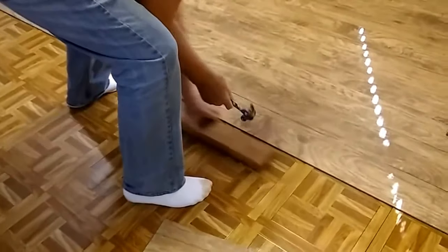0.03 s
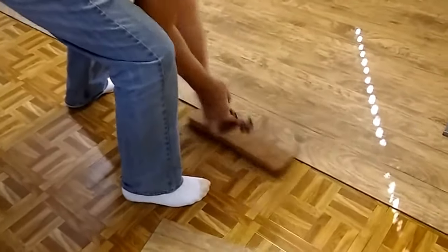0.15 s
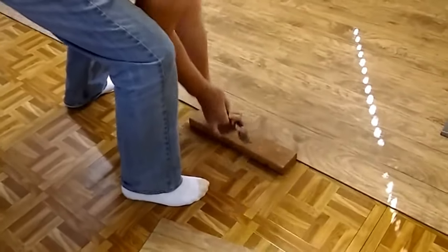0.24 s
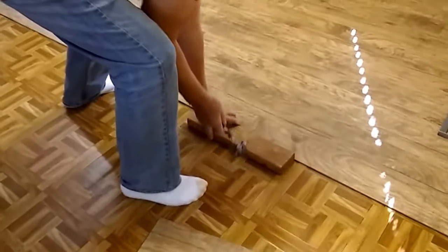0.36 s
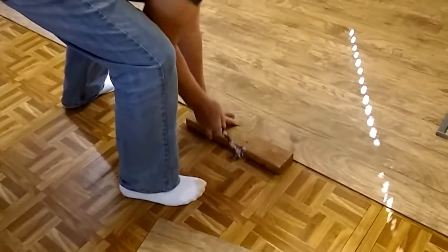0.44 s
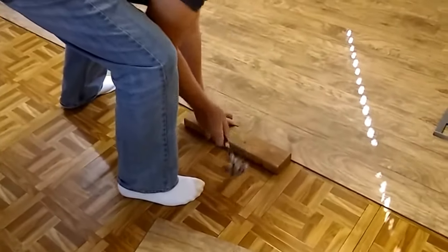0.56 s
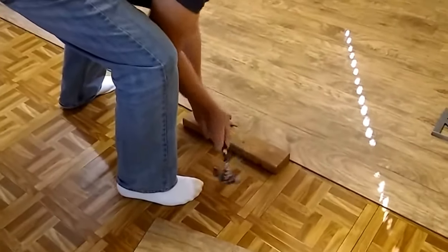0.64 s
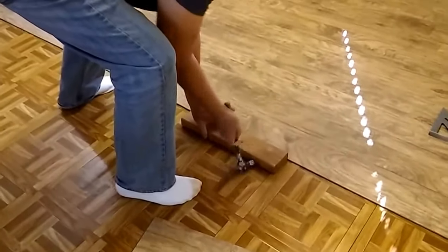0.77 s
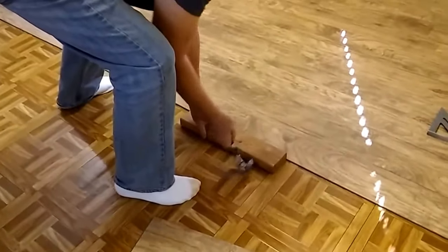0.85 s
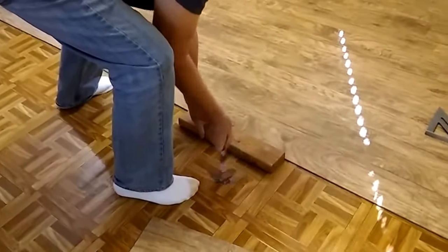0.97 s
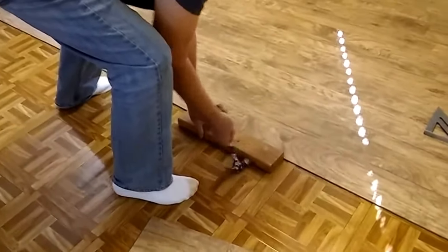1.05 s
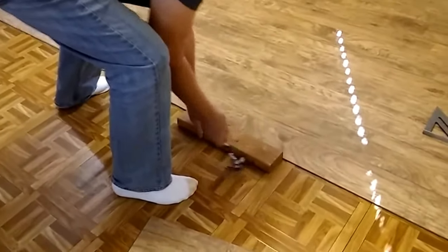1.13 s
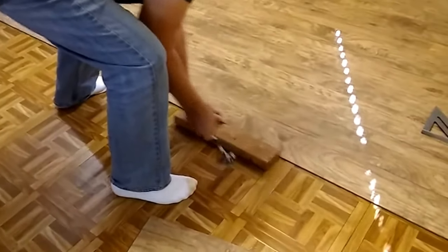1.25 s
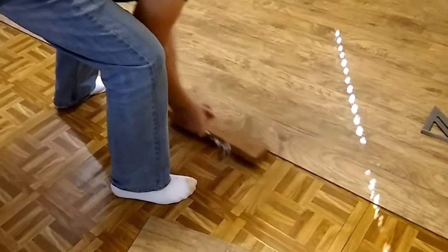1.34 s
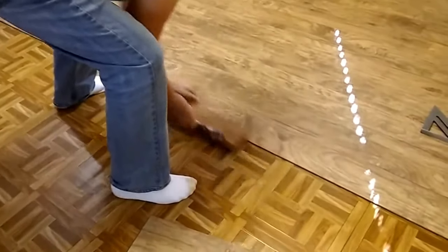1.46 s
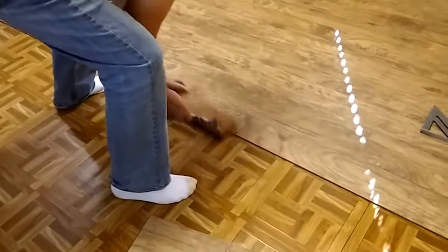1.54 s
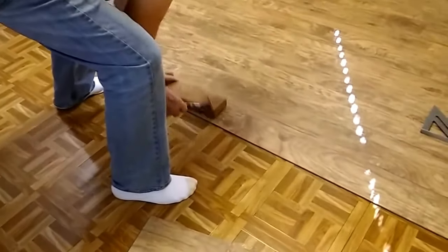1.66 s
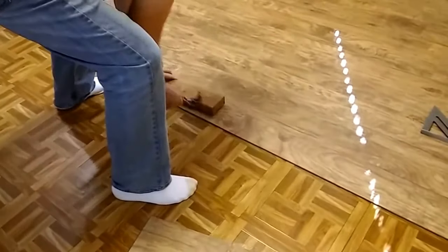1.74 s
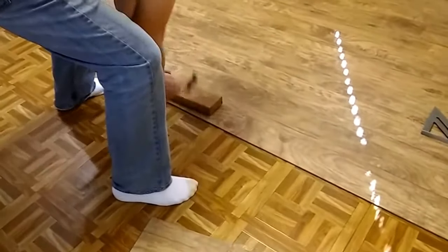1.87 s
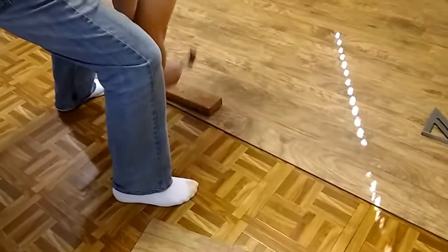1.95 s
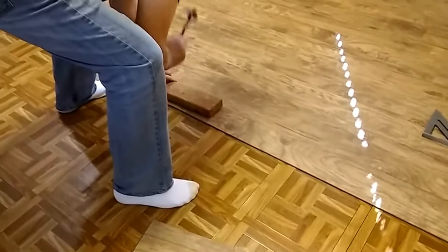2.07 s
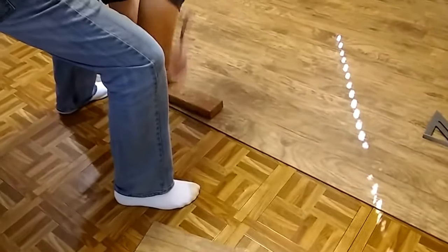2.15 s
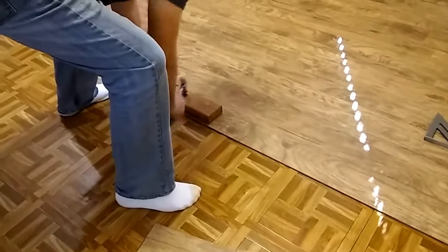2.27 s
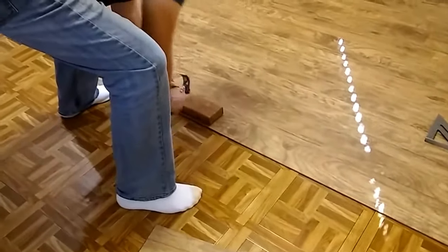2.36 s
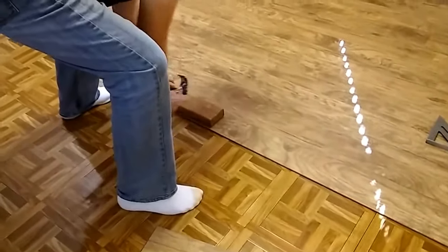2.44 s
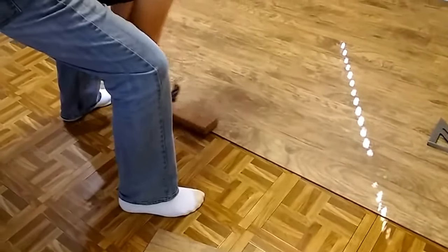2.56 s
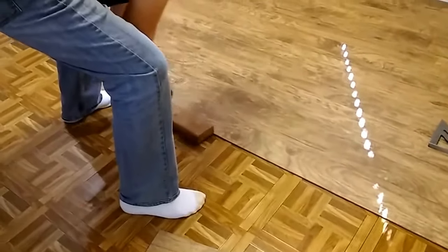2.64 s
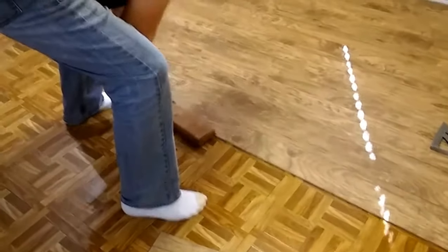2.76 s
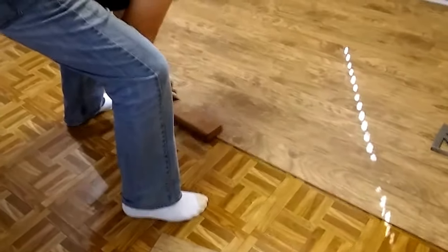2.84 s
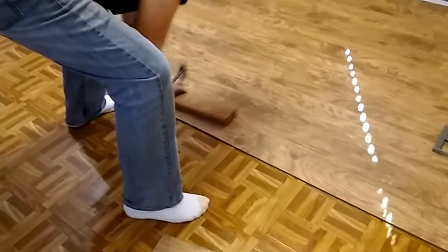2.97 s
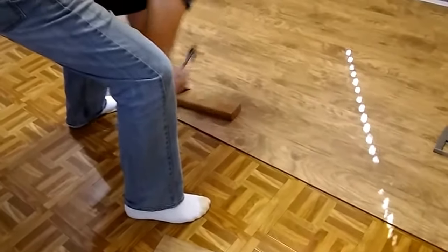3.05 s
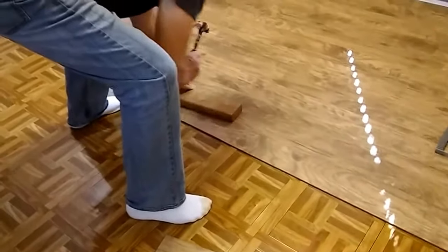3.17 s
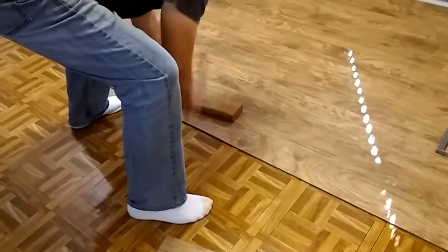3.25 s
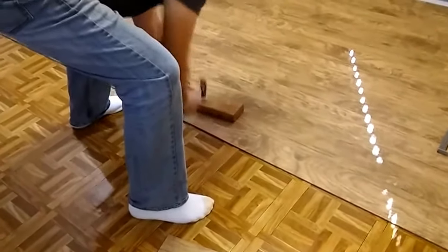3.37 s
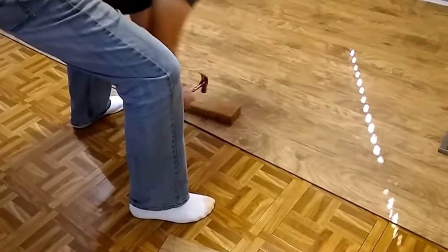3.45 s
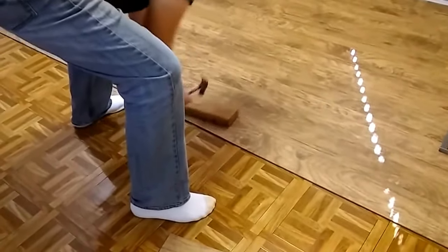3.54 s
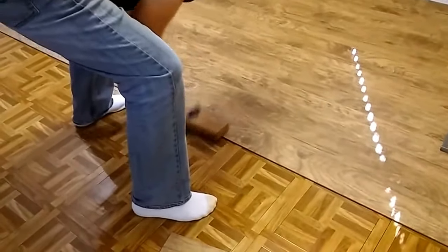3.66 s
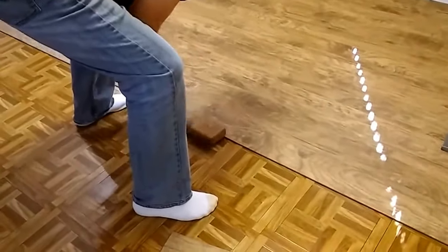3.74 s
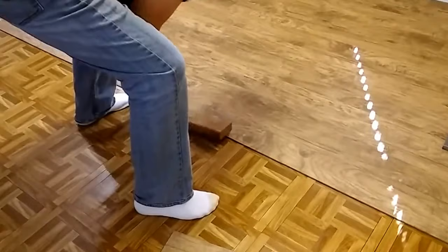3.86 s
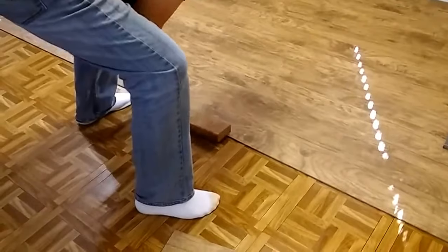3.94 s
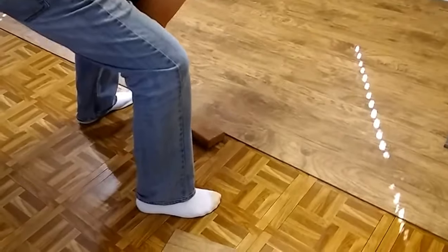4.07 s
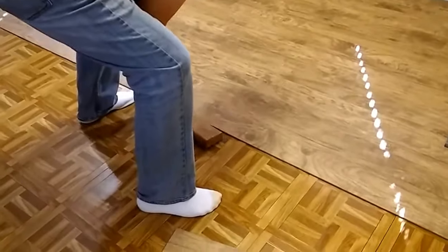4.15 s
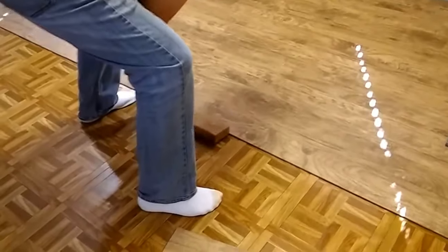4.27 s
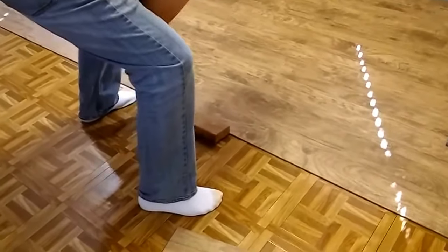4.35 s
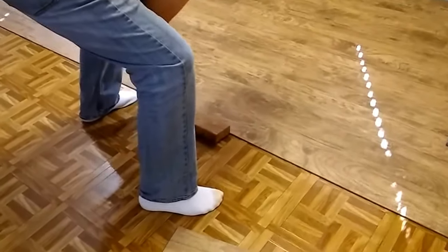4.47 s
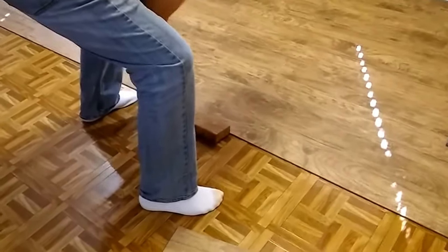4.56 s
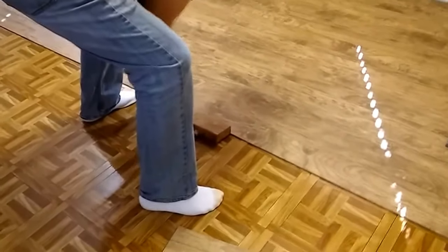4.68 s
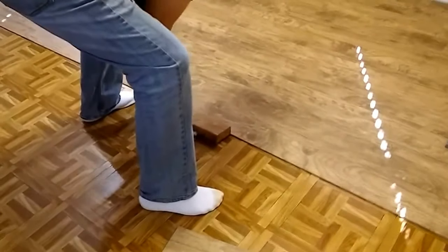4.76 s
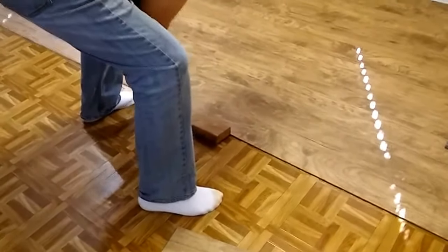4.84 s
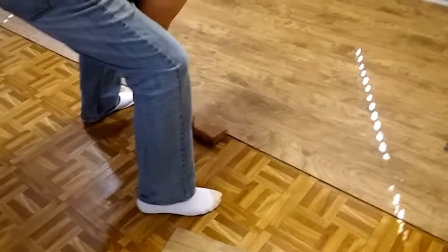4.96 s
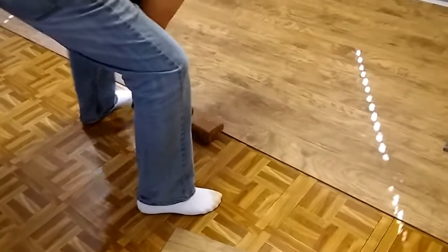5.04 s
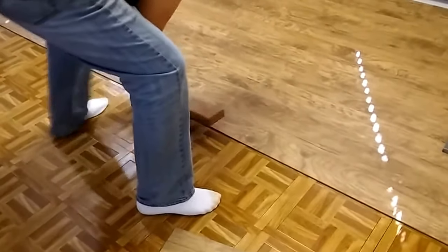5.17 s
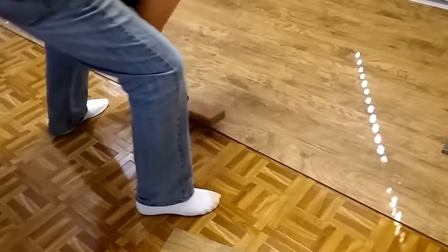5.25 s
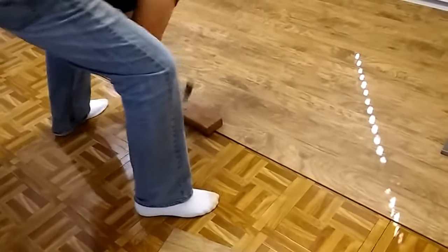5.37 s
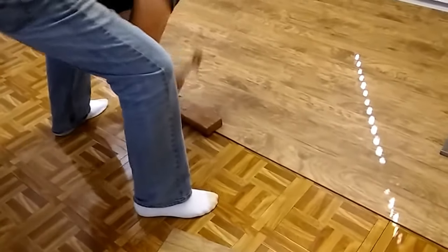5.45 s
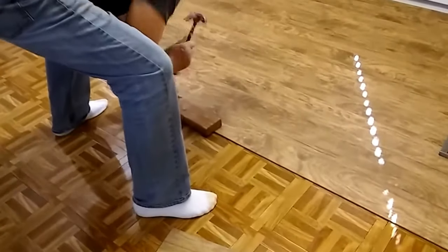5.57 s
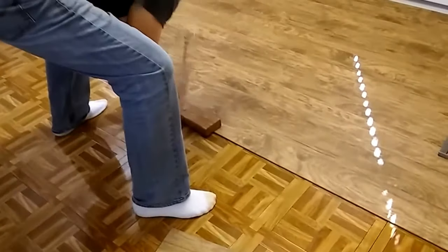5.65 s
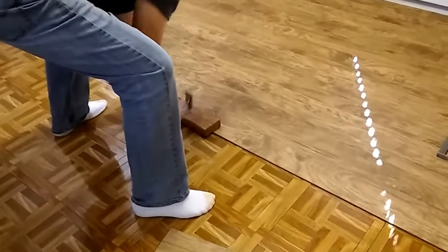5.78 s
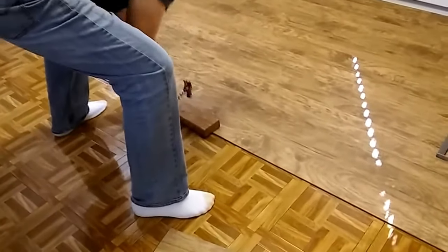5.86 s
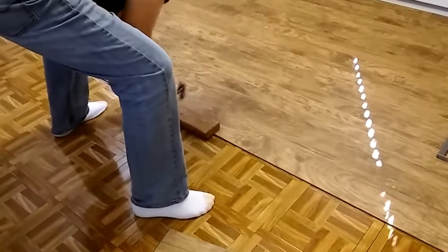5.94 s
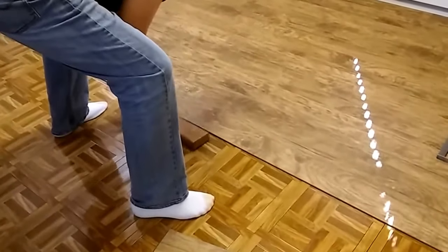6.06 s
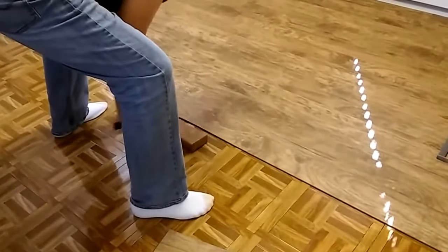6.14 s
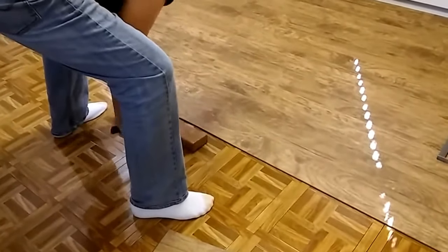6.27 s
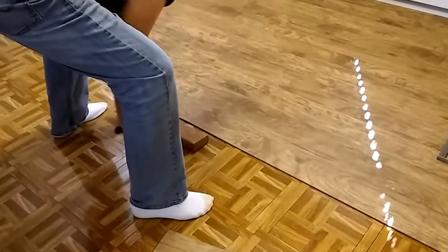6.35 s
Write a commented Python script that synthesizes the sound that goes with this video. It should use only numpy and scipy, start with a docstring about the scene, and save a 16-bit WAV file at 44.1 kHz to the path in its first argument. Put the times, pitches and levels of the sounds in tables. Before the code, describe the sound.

Six hard hammer blows on a wooden block against floor planks crack through a bare, echoing room, among soft thuds, clicks and one brief slide.

```python
"""Six hard wooden knocks ring out in a bare room: a hammer drives a block against the edge of a floor plank.
Each blow is a short burst of contact noise, filtered by the wood's resonances and prolonged by reverberation.
Around the blows come soft thuds and clicks, shuffling taps, ringing steel, one slide of the block over the
boards and dull finger bumps on the camera body, all over low room noise and a faint, nearly steady whine.
A fast limiter holds the loud blows down."""
import sys
import numpy as np
from scipy import signal
from scipy.fft import rfft
from scipy.io import wavfile
from scipy.ndimage import uniform_filter1d, minimum_filter1d

SR = 44100
rng = np.random.default_rng(int(sys.argv[2]) if len(sys.argv) > 2 else 0)


def to_wav(sig):
    """Store sig (one row per channel, or 1-D mono) as 16-bit WAV at the path in sys.argv[1].

    Samples outside -1..1 are clipped; the rate is SR.
    """
    pcm = np.clip(np.atleast_2d(sig), -1, 1) * 32767
    pcm = np.round(pcm).astype(np.int16)
    wavfile.write(sys.argv[1], SR, pcm.T)  # frames by channels


N = 282681
HZ = np.fft.rfftfreq(16384, 1 / SR)  # frequency axis of every filter
TIME = np.arange(SR) / SR  # one second, the length of every single event

# hammer blows; stroke is 0 side tap, 1 full swing, 2 short swing:
# start_s, force_db, stroke, floor_thump_db, treble_crack_db, direct_sound_db, block_swing_db
BLOWS = [(0.7706, -4.5, 0, -12, -2, 2.5, 4.5), (1.0506, -8, 0, -8, -7.5, 6.5, 5.5),
         (2.2213, 2, 1, -3, 6.5, 8, -11), (3.3168, 1, 1, -2, 4.5, 8.5, -7),
         (4.6843, -6.5, 2, -2.5, 2, 2, -6.5), (5.7059, 2, 1, -0.5, 7, 9, 3)]
# the block set down, the hammer laid against it: start_s, thud_db, thud_top_hz, click_db
KNOCKS = [(0.118, -10.5, 170, -44.5), (0.141, -8, 180, -40.5), (0.196, -19.5, 476, -30.5),
          (.222, -12.5, 690, -55), (1.629, -12.5, 257, -32.5), (3.875, -23.5, 456, -48.5),
          (4.018, -23, 303, -42.5), (4.043, -11, 294, -33), (4.151, -20.5, 308, -41.5),
          (4.262, -9, 408, -32.5), (5.2628, -12.5, 277, -30.5), (5.293, -5.5, 416, -21),
          (6.063, -11.5, 292, -31.5), (6.205, -20.5, 535, -45.5)]


def hammer(thump_hz=400, crack_hz=5000, direct_resonance=0.56, contact_delay_s=0.001):
    """Impact excitation: the block swings, slams into the plank, and contact force drives wood and room."""
    # spectrum of the steel-on-wood contact: pitch_hz, level_db
    contact_spectrum = [(20, 3), (60, 21.5), (105, 24), (140, 30), (400, 32.5), (750, 31.5), (1500, 30.5),
                        (3000, 30.5), (5000, 15.5), (7000, 6), (9500, -8), (15500, -16)]
    # direct path against the room path: pitch_hz, level_db
    direct_path = [(50, -33), (150, -18.5), (500, -34), (2000, -35.5), (4000, -30.5), (7000, -26.5),
                   (14000, -21)]
    out = np.zeros(N)
    low = 1 / (1 + (HZ / thump_hz) ** 2)
    high = HZ ** 2 / (HZ ** 2 + crack_hz ** 2)
    block_hz, block_decay_s, block_rise_s = 950, 0.0012, 0.00066
    swing = np.sin(2 * np.pi * block_hz * TIME) * np.exp(-TIME / block_decay_s)
    swing *= 1 - np.exp(-TIME / block_rise_s)
    for s, force_db, stroke, thump_db, crack_db, direct_db, swing_db in BLOWS:
        # downward force adds thump, hard contact adds treble
        contact = amp(force_db + read(contact_spectrum, HZ) + thump_db * low + crack_db * high)
        body = wood(stroke)
        # the direct sound carries the resonances in flattened form
        direct_gain = amp(direct_db + read(direct_path, HZ)) * contact * body ** direct_resonance
        direct = reflected(colour(burst(decay_s=0.005), direct_gain))
        reverberant = colour(room_tail(build_s=0.0011), contact * body)
        add(out, s, reflected(amp(swing_db) * swing))
        add(out, s + contact_delay_s, direct + reverberant)
    return out


def burst(decay_s, uneven_db=3.5):
    """Impulsive contact: one push, then a short, uneven chatter of wood on wood with exponential decay."""
    sign = rng.choice([-1., 1.], SR)
    size = evened(uniform_filter1d(rng.standard_normal(SR), size=24))
    chatter = evened(amp(uneven_db * size) * sign) * np.exp(-TIME / decay_s)
    chatter[0] += 6
    return chatter


def wood(stroke):
    """Modal resonance: where the block is hit decides how strongly each mode responds."""
    # modes of block, planks and floor: pitch_hz, width_hz, side_tap_db, full_swing_db, short_swing_db
    wood_modes = [(153.3, 12, 17, 12, 9), (167, 15, 4, 6, 11.5), (198.5, 17, 11, 5, 0),
                  (248.5, 8.6, 8.5, 10.5, 4.5), (309.4, 37, 13, 13.5, 17), (395, 31, -38.5, -3, 14),
                  (432, 5.5, 12, 11.5, 12.5), (527, 100, 11.5, 8, 8), (608, 32, -18.5, 8.5, -12),
                  (717, 130, 8.5, 4.5, 9), (782, 110, 6.5, -3, -21), (970, 150, 9.5, -35.5, -7),
                  (1095, 82, 14, 12.5, 9.5), (1220, 240, 6.5, 7.5, 5), (1424, 28, 8, 8.5, 8),
                  (1518, 13, 5, 8.5, -3), (1576, 23, -3.5, 10.5, 9), (1724, 53, 8.5, 11.5, 7.5),
                  (1920, 110, 8, 2.5, 5), (2218, 110, 1.5, 7, 7.5), (2362, 40, 10.5, 9, 14),
                  (2454, 35, 11.5, -6, 7.5), (2920, 120, -23, -1, -14.5), (3012, 42, 6, 3.5, -11.5),
                  (3295, 120, 6.5, -13.5, 11.5), (4230, 820, 3.5, -1.5, 6), (4730, 150, 0, -81, 9.5),
                  (5710, 440, 0, -1, 9)]
    hz, width, *stroke_db = np.transpose(wood_modes)
    peaks = 1 / (1 + (2 * (HZ[:, None] - hz) / width) ** 2)  # power response of each mode
    power = amp(stroke_db[int(stroke)]) ** 2
    return np.sqrt(1 + peaks @ power)


def room_tail(build_s):
    """Diffuse reverberation: dense reflections build up, then die band by band; spectrum levelled to 1."""
    # reverberation of the bare room: pitch_hz, t60_s
    room_decay = [(50, 0.36), (150, 0.48), (300, 0.4), (600, 0.49), (1200, 0.57), (2500, 0.61), (4500, 0.6),
                  (7000, 0.5), (11000, 0.47), (16000, .31)]
    hz, t, z = signal.stft(rng.choice([-1., 1.], SR), SR, nperseg=512)
    z = z * amp(-60 * t / read(room_decay, hz)[:, None])
    tail = signal.istft(z, SR, nperseg=512)[1][:SR]
    tail = tail * (1 - np.exp(-TIME / build_s))
    power = uniform_filter1d(abs(rfft(tail, 16384)) ** 2, size=14)
    return colour(tail, 1 / np.sqrt(power))


def reflected(x):
    """Specular reflection: delayed, scaled copies follow the direct sound."""
    # first reflections from floor, ceiling and walls: delay_s, level_db
    first_echoes = [(.0022, -3.5), (.0046, -8), (.0094, -2.5), (0.0138, -5.5), (0.0208, -6.5),
                    (.029, -14.5)]
    out = x.copy()
    for delay_s, db in first_echoes:
        add(out, delay_s, amp(db) * x)
    return out


def knocks(floor_hz=125, thud_ring=0.7, thud_room_db=25, click_room_db=25, click_ring=0.54):
    """Contact stiffness: soft contacts thud in the floor, hard corners add a light click."""
    # spectrum of the light clicks: pitch_hz, level_db
    click_spectrum = [(100, -19), (600, 7), (1700, 5), (3500, -1), (5500, -11.5), (8000, -22.5),
                      (15000, -40)]
    out = np.zeros(N)
    # exponents below 1 flatten the resonances
    body = wood(0) ** thud_ring
    clack = amp(read(click_spectrum, HZ)) * wood(2) ** click_ring
    floor = (HZ / floor_hz) ** 3 / np.sqrt(1 + (HZ / floor_hz) ** 6)  # high-pass
    for s, thud_db, top_hz, click_db in small_contacts():
        soft = 1 / np.sqrt(1 + (HZ / top_hz) ** 8)  # low-pass
        thud_room = room_tail(build_s=0.0055) * np.exp(-TIME / 0.19)
        thud = burst(decay_s=0.028) + amp(thud_room_db) * thud_room
        click = burst(decay_s=0.004) + amp(click_room_db) * room_tail(build_s=0.0017)
        add(out, s, colour(thud, amp(thud_db) * floor * soft * body))
        add(out, s, colour(click, amp(click_db) * clack))
    return out


def small_contacts(settle_s=0.048, settle_db=-9.5):
    """Repeated impact: each knock rocks once more, later and softer; shifting feet and hands tap in runs."""
    # feet and hands shifting, a run of soft taps: start_s, end_s, thud_db
    tap_runs = [(0.002, .11, -24.5), (1.462, 1.6, -26.5), (4.225, 4.26, -16.5), (4.39, 4.5, -35.5),
                (5.65, 5.7, -31.5)]
    tap_gap_s, tap_spread_db, tap_top_hz, tap_click_db = 0.059, 1.5, 218, -50
    rows = list(KNOCKS)
    for (s, thud_db, top_hz, click_db), late in zip(KNOCKS, rng.random(len(KNOCKS))):
        rows.append((s + settle_s * (.5 + late), thud_db + settle_db, top_hz, click_db + settle_db))
    for start, end, db in tap_runs:
        gaps = rng.random(8)
        thuds, clicks = rng.standard_normal(8), rng.standard_normal(8)
        times = start + tap_gap_s * np.r_[0, np.cumsum(.5 + gaps)]
        for s, thud, click in zip(times, thuds, clicks):
            if s < end:
                thud_db, click_db = db + tap_spread_db * thud, tap_click_db + tap_spread_db * click
                rows.append((s, thud_db, tap_top_hz, click_db))
    return rows


def pings(head_hz=2560, head_t60_s=0.56, head_knock_db=-21, head_blow_db=-39.5):
    """Free vibration: the steel head rings in step with each knock's click and blow's force; boards sound notes."""
    # a tight joint or a hollow board sounding one note under load: start_s, pitch_hz, level_db, t60_s
    board_notes = [(0.14, 1800, -37, .12), (.222, 714, -23, 0.018), (4.042, 1730, -44, 0.26)]
    out = np.zeros(N)
    for s, _, _, click_db in KNOCKS:
        add(out, s, mode(head_hz, click_db + head_knock_db, head_t60_s))
    for s, force_db, *_ in BLOWS:
        add(out, s, mode(head_hz, force_db + head_blow_db, head_t60_s))
    for s, hz, db, t60 in board_notes:
        add(out, s, mode(hz, db, t60))
    return out


def mode(hz, db, t60):
    """Damped oscillation: a single mode loses 60 dB in t60 seconds."""
    return amp(db - 60 * TIME / t60) * np.sin(2 * np.pi * hz * TIME)


def slide(start_s=2.837, rise_s=0.11, hold_s=0.05, fade_db_per_s=86.5, level_db=-45, grain_db=1.5):
    """Sliding friction: fine grains of noise as the block gathers speed over the boards, glides and fades."""
    # spectrum of wood rubbing on boards: pitch_hz, level_db
    rub_spectrum = [(80, -7), (280, 8.5), (600, 2.5), (1800, 1), (4000, -2), (6000, -14), (8500, -27),
                    (15000, -29)]
    t = np.arange(N) / SR - start_s
    fading_s = np.maximum(t - rise_s - hold_s, 0)
    level = np.clip(t / rise_s, 0, 1) * amp(level_db - fade_db_per_s * fading_s)
    grains = evened(uniform_filter1d(rng.standard_normal(N), size=160))
    friction = rng.standard_normal(N) * amp(grain_db * grains)
    return level * evened(colour(friction, amp(read(rub_spectrum, HZ))))


def bumps(decay_cycles=0.49, rise_s=0.00035, casing_hz=600, rattle_s=0.0074):
    """Structure-borne sound: dull, dry pops reach the microphone through the casing; the lower, the longer."""
    # fingers bumping the camera body: start_s, level_db, pitch_hz, casing_rattle_db
    finger_bumps = [(1.8026, -11, 298, -12), (1.8219, -15.5, 241, -15), (1.844, -24, 294, -24),
                    (2.499, -10, 400, -43), (2.768, -26, 287, -35), (2.785, -27.5, 158, -24.5),
                    (3.0148, -11.5, 394, -33), (3.1575, -8, 400, -43)]
    out = np.zeros(N)
    for s, db, hz, rattle_db in finger_bumps:
        swing = np.sin(2 * np.pi * hz * TIME) * np.exp(-TIME * hz / decay_cycles)
        swing *= 1 - np.exp(-TIME / rise_s)
        noise = rng.standard_normal(SR) * np.exp(-TIME / rattle_s)
        rattle = colour(noise, 1 / (1 + (HZ / casing_hz) ** 2))
        add(out, s, amp(db) * swing + amp(rattle_db) * rattle)
    return out


def background(air_db=-58.5, whine_hz=1121, whine_db=-66, waver_hz=0.32):
    """Stationary noise and a tone: shaped random noise under a thin whine whose frequency wavers slightly."""
    # relative spectrum of the quiet room: pitch_hz, density_db_per_hz
    quiet_spectrum = [(20, -38.5), (45, -9), (100, -4), (200, -4.5), (310, -3.5), (380, -11.5), (520, -11),
                      (1100, -21), (2000, -25.5), (4000, -28), (6000, -32), (8500, -51.5), (16000, -53.5)]
    air = evened(colour(rng.standard_normal(N), amp(read(quiet_spectrum, HZ))))
    drift = evened(uniform_filter1d(rng.standard_normal(N), size=4000))
    phase = 2 * np.pi * np.cumsum(whine_hz + waver_hz * drift) / SR
    return amp(air_db) * air + amp(whine_db) * evened(np.sin(phase))


def amp(db):
    """Logarithmic level: decibels to amplitude gain."""
    return 10 ** (np.asarray(db) / 20)


def evened(x):
    """Effective value: scales a signal to rms 1."""
    return x / np.sqrt(np.mean(x ** 2) + 1e-20)


def read(points, hz):
    """Logarithmic pitch scale: interpolates a table along a log-frequency axis."""
    f, value = np.transpose(points)
    return np.interp(np.log(hz + 1), np.log(f), value)


def add(mix, s, sound):
    """Superposition: adds a sound into the mix, in place, at time s."""
    part = mix[max(round(s * SR), 0):][:len(sound)]
    part += sound[:len(part)]


def colour(x, gain):
    """Minimum-phase filtering by the gain on HZ: peaks ring after the hit, never before."""
    log_gain = np.log(np.maximum(gain, 1e-5))
    circle = np.r_[log_gain, log_gain[-2:0:-1]]
    # the Hilbert transform of the log gain gives the causal phase
    response = np.exp(np.conj(signal.hilbert(circle)))
    taps = np.fft.ifft(response).real[:len(HZ)]
    return signal.fftconvolve(x, taps)[:len(x)]


def scene():
    """Superposition: all sources sum at one microphone."""
    return (hammer() + knocks() + pings() + bumps() + slide() + background())[None]


def record(dry, recovery_db_per_s=350, threshold_db=2.5, clip_level=0.94, edge_hz=16100):
    """Dynamic compression: a fast limiter, flattening of the peaks it lets through, then a band limit."""
    over_db = np.maximum(20 * np.log10(abs(dry[0]) + 1e-9) - threshold_db, 0)
    fall = np.arange(N) * recovery_db_per_s / SR
    gain_db = fall - np.maximum.accumulate(over_db + fall)  # instant drop, linear recovery in dB
    gain_db = uniform_filter1d(minimum_filter1d(gain_db, size=25), size=25)
    limited = np.clip(dry * amp(gain_db), -clip_level, clip_level)
    low_pass = signal.firwin(601, edge_hz, window=("kaiser", 9), fs=SR)
    return signal.oaconvolve(limited, low_pass[None], "same")


dry = scene()
out = record(dry)
to_wav(out)
```